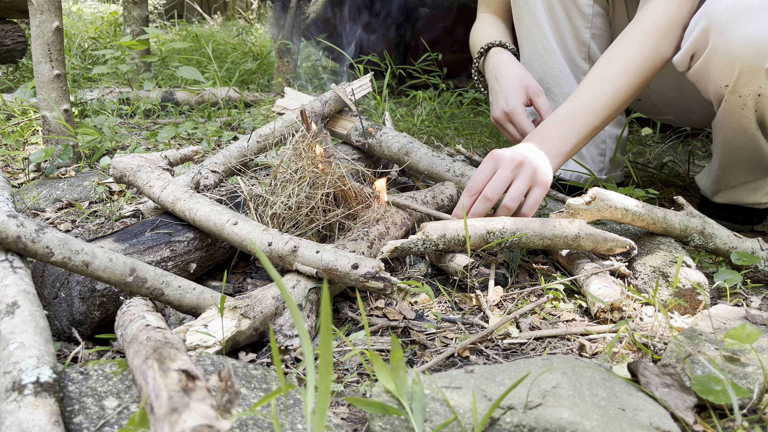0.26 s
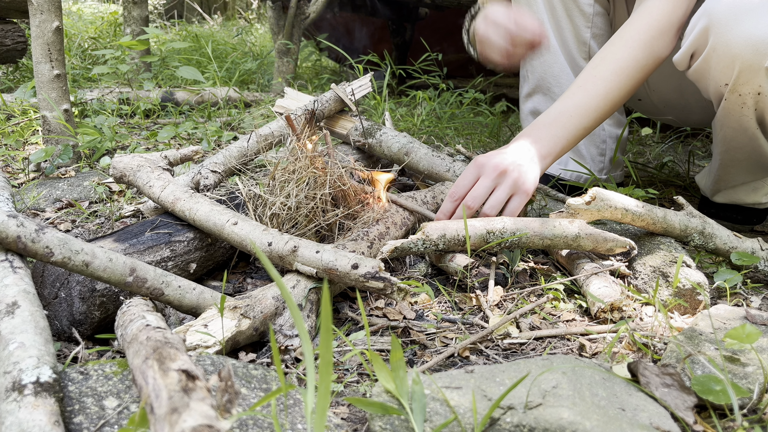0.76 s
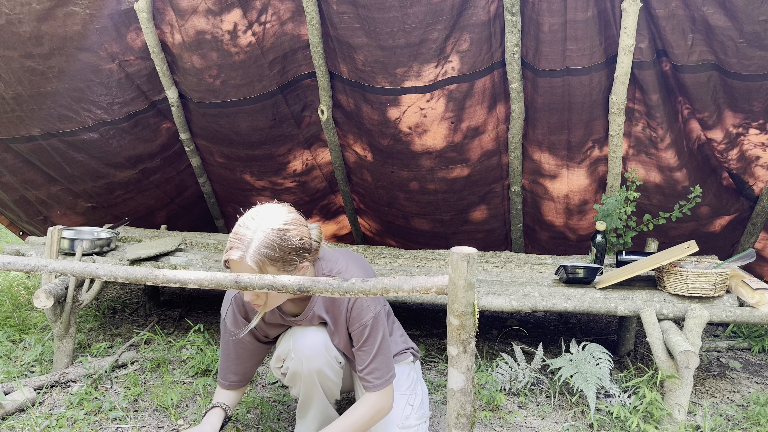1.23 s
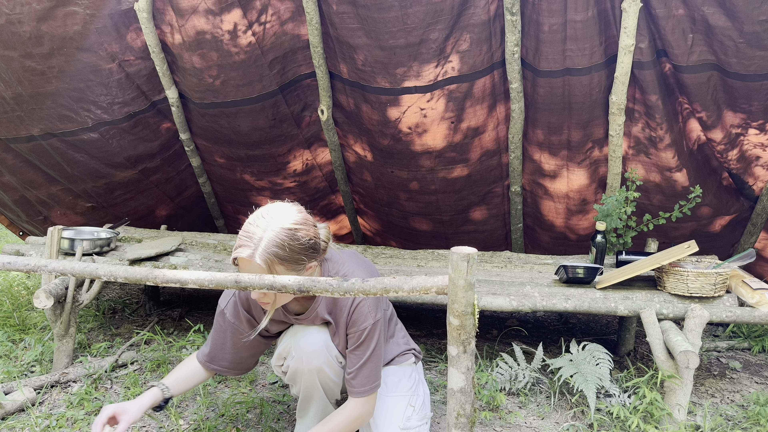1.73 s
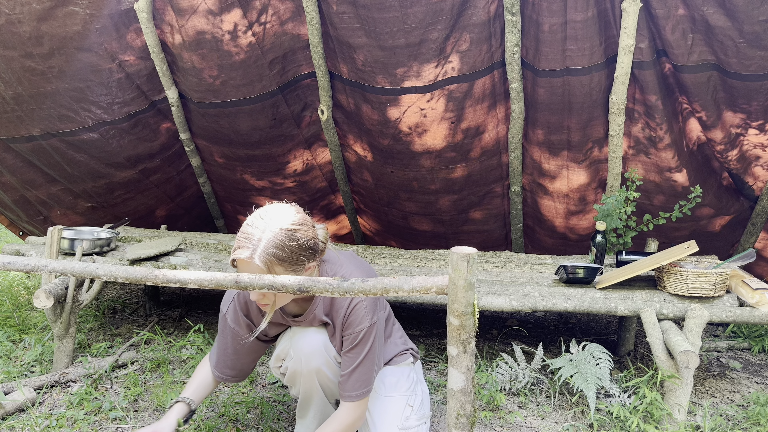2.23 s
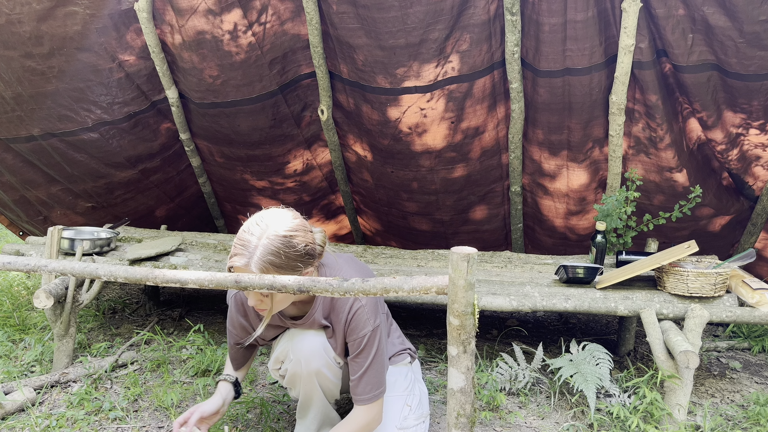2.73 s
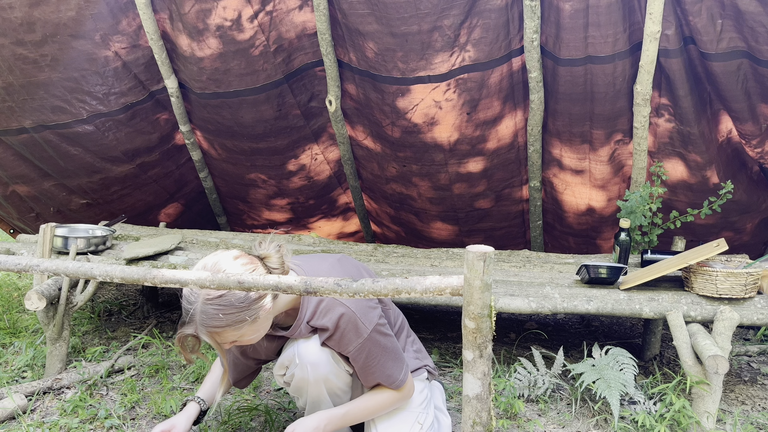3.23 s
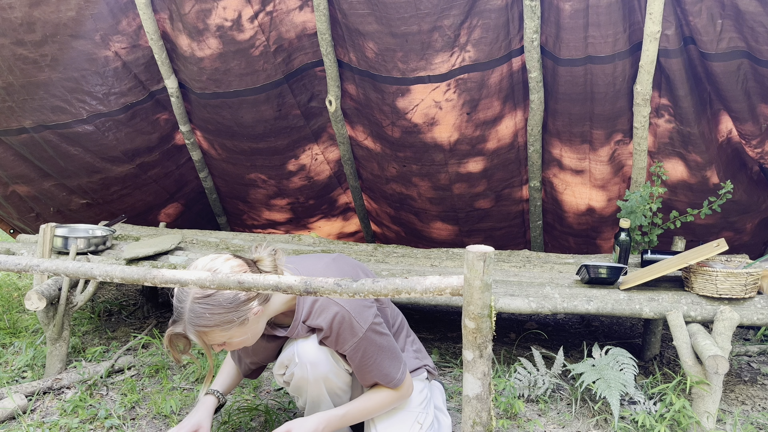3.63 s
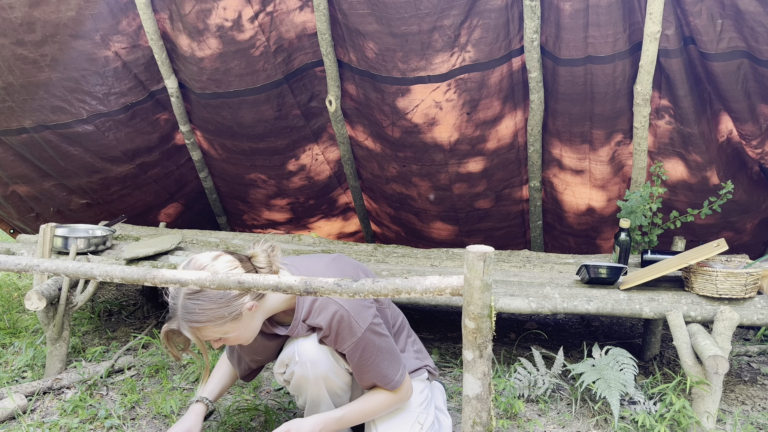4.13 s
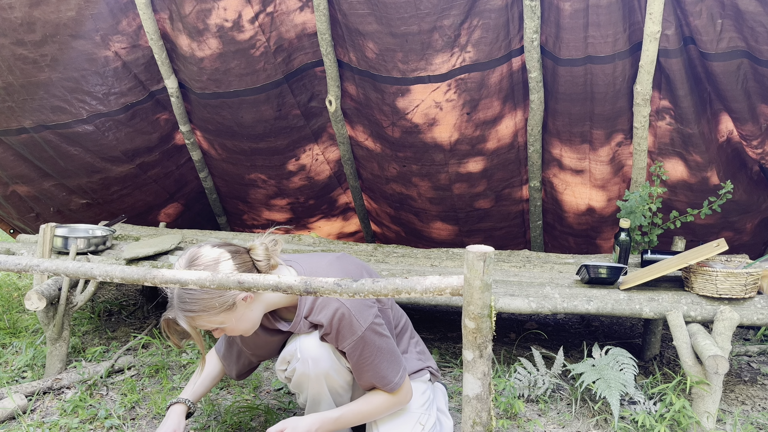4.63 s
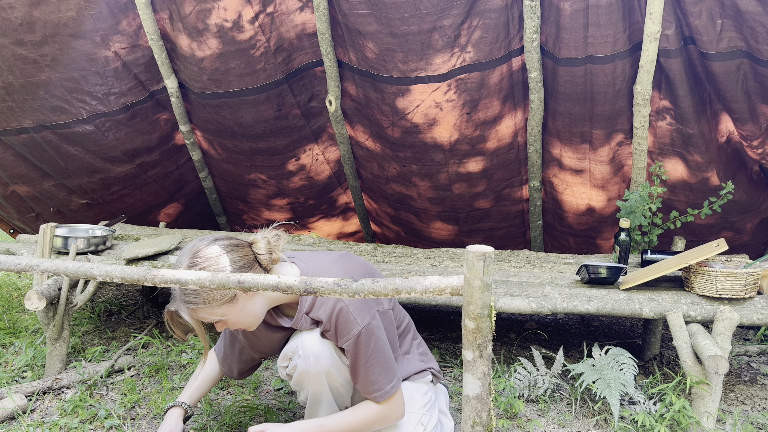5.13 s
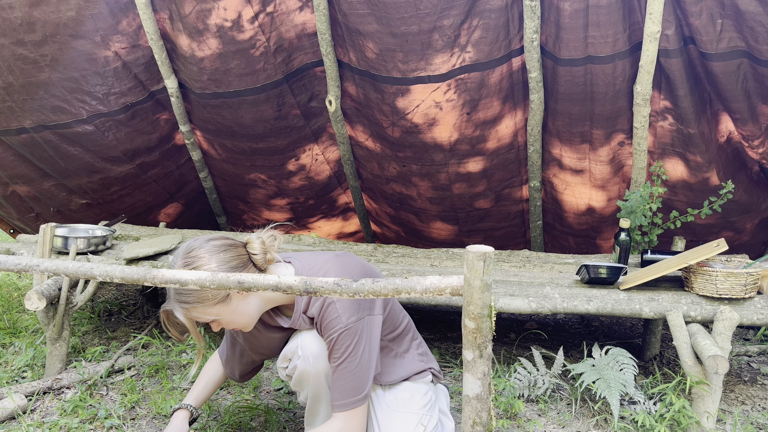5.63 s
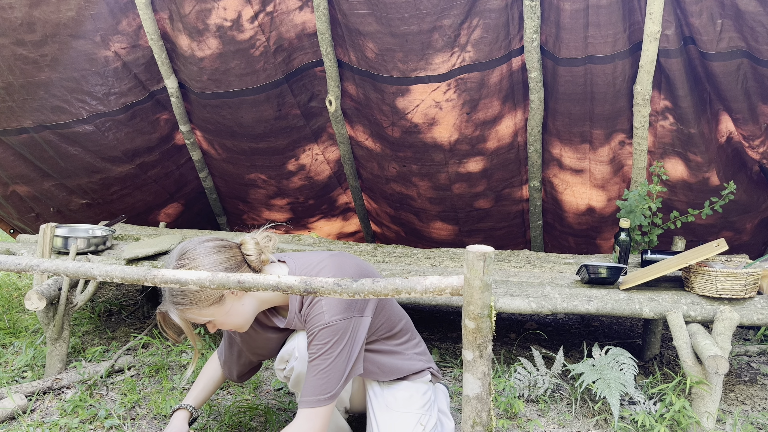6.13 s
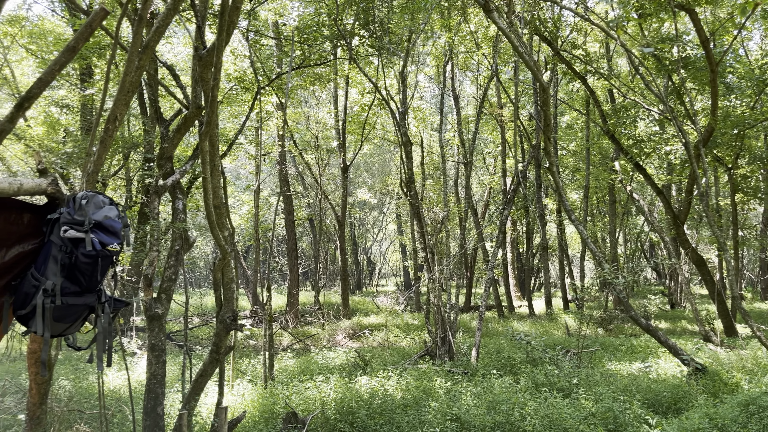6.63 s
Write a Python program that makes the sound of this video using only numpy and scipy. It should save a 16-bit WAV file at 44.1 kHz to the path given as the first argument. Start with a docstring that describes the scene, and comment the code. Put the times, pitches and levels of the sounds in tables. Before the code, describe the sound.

Woodland camp in four cut-together takes. Steady deep rumble dominates; crickets and leaves shimmer softly above. Tiny fire crackles open it, followed by twig rustles, a sharp crack and a woody knock around two seconds. Faint birds whistle and chip through tree echoes while a distant engine drones, rising in pitch midway. The last take is calmer, with one final snap and knock; open-air stereo pickup.

```python
"""A woodland camp in four scenes joined by quick fades. First a far road rumbles (shaped noise), leaves and grass
hiss, crickets sing (throbbing noise bands), a small fire snaps (short bursts), and the litter ticks.
In the second and third scenes an engine drones (two sines) and hands shift dry sticks (struck resonances);
three birds whistle (gliding sines), partly through echoes from the trunks (decaying noise).
The last scene brings a faint tone, with a last snap and knock near its start."""
import sys
import numpy as np
from scipy import signal
from scipy.fft import rfft, irfft, next_fast_len
from scipy.io import wavfile
from scipy.ndimage import uniform_filter1d, map_coordinates

SR = 44100
rng = np.random.default_rng(int(sys.argv[2]) if len(sys.argv) > 2 else 0)


def bounce(signal):
    """Save signal as a 16-bit WAV file at the path given by the first command-line argument."""
    frames = np.transpose(np.atleast_2d(signal))
    limited = np.clip(frames, -1, 1)
    pcm = np.round(limited * 32767).astype(np.int16)
    wavfile.write(sys.argv[1], SR, pcm)


def boost(x):
    """Linear amplitude factor 10**(x/20) for a level x in decibels (scalar or array-like)."""
    u = np.asarray(x, float) / 20
    return 10 ** u


N = 302967


def unit(x):
    """Normalisation by signal power: scales to rms 1."""
    return x / np.sqrt(np.mean(x ** 2) + 1e-20)


def along(points, hz):
    """Interpolation on a logarithmic frequency axis."""
    f, v = np.transpose(points)
    return np.interp(np.log(hz + 1), np.log(f + 1), v)


def curves(rows):
    """Piecewise-linear control curves: one value per sample for each column after the time."""
    s, *cols = np.transpose(rows)
    return [np.interp(np.arange(N) / SR, s, c) for c in cols]


def wobble(rate):
    """Low-frequency random modulation: a spline through normal knots, rate of them a second."""
    knots = rng.standard_normal(int(N * rate / SR) + 4)
    return map_coordinates(knots, [np.arange(N) * rate / SR])


def filtered(x, response):
    """Linear filtering: the spectrum times a complex response of frequency."""
    m = next_fast_len(N + 8192)
    return irfft(rfft(x, m) * response(np.fft.rfftfreq(m, 1 / SR)), m)[..., :N]


# The four scenes: (start time [s], road rumble [dB], tyre wash [dB],
# engine octave [dB re firing tone], steady twig rustle [dB]); levels are before random modulation
SCENES = [(0, -51.5, -72.5, -34, -98), (0.929, -50.5, -65.5, -13.5, -78.5), (3.2, -53, -64.5, -28.5, -89.5),
          (6.432, -54, -64.5, -30, -73.5)]


def by_scene(column):
    """Stepwise control: one column of the scene table, per sample."""
    table = np.array(SCENES)
    return table[np.searchsorted(table[1:, 0], np.arange(N) / SR), column]


# Left lead in the first three scenes: (frequency [Hz], phase [rad])
EARLY_LEAD = [(0, 0), (500, .1), (1200, -2.7), (1600, -2.9), (1900, .5), (4800, .8), (8000, -3),
              (9100, -3.3), (10900, -6.1), (12900, -6.4), (14600, -9.3), (15800, -9.5)]
# Left lead in the last scene: (frequency [Hz], phase [rad])
LAST_LEAD = [(0, 0), (400, -.2), (1000, -2.6), (6300, -3), (8100, -.1), (9600, .2), (11700, 3),
             (13100, 3.3), (15500, 6.2)]


def stereo(x):
    """Interchannel phase: half the left lead on each side, with another lead table in the last scene."""
    def spread(lead):
        half = lambda hz: .5j * np.interp(hz, *np.transpose(lead))
        return filtered(x, lambda hz: np.exp(half(hz) * [[1], [-1]]))
    return np.where(np.arange(N) / SR < SCENES[-1][0], spread(EARLY_LEAD), spread(LAST_LEAD))


# Left-right likeness of the noise: (frequency [Hz], shared share of power [0-1])
LIKENESS = [(100, 0.94), (300, 0.76), (600, 0.12), (1300, 0.29), (6500, 0.057), (7800, 0.93), (14000, 0.82),
            (15000, 0.97)]


def rush(spectrum, patchy_db):
    """Partial coherence: patchy stereo noise of rms 1, part shared by the channels and part each one's own."""
    z = signal.stft(rng.standard_normal((3, N)), nperseg=512)[2]
    field = uniform_filter1d(rng.standard_normal(z.shape[1:]), size=6, axis=0)
    field = uniform_filter1d(field, size=10, axis=1)
    noise = signal.istft(z * boost(patchy_db * unit(field)), nperseg=512)[1][:, :N]

    def response(hz):
        alike = np.clip(along(LIKENESS, hz), 0, 1)
        return boost(along(spectrum, hz)) * np.sqrt([alike, 1 - alike, 1 - alike])
    parts = filtered(noise, response)
    return unit(stereo(parts[0]) + parts[1:])


def add(track, s, sound):
    """Superposition: mixes a sound in at s seconds; the track starts one second early."""
    track[round((s + 1) * SR):][:len(sound)] += sound


# Echo among trunks: (frequency [Hz], 60 dB decay time [s])
TRUNK_DECAY = [(300, 0.25), (3000, 0.92), (7000, 0.66), (14000, 0.15)]


def echo(track, slice_s):
    """Diffuse reverberation: convolution with decaying noise, a new tail for each slice of time."""
    out, step = np.zeros((2, len(track) + 2 * SR)), round(slice_s * SR)
    for i in range(0, len(track), step):
        hz, t, z = signal.stft(rng.standard_normal((2, SR // 2)), SR, nperseg=256)
        decay = boost(-60 * t / along(TRUNK_DECAY, hz)[:, None])
        tail = signal.istft(z * decay, SR, nperseg=256)[1]
        part = signal.fftconvolve(track[None, i:i + step], tail / np.linalg.norm(tail[0]), axes=1)
        out[:, i:i + part.shape[1]] += part
    return out[:, SR:SR + N]  # drops the early second


# Relative spectrum of the far road: (frequency [Hz], level [dB])
ROAD_SPECTRUM = [(18, -30), (42, 10.5), (64, 12), (95, 11), (125, 3), (220, -5.5), (420, -37)]
# Relative spectrum of the tyre wash: (frequency [Hz], level [dB])
WASH_SPECTRUM = [(150, -15), (260, -3.5), (600, -4), (1000, -8), (1500, -16), (2200, -28.5), (3500, -52)]


def road():
    """Broadband noise shaping: rumble and tyre wash share one slow swell."""
    swell = wobble(3.294)
    rumble = boost(by_scene(column=1) + 0.68 * swell) * rush(ROAD_SPECTRUM, patchy_db=1.2)
    wash = boost(by_scene(column=2) + 0.73 * swell) * rush(WASH_SPECTRUM, patchy_db=1.25)
    return rumble + wash


# Engine drone: (time [s], firing frequency [Hz], level before modulation and channel gain [dB])
ENGINE_COURSE = [(.95, 54.5, -47.5), (1.54, 54.84, -44.5), (2.4, 54.53, -46.5), (2.55, 54.38, -52),
                 (3.18, 56.96, -55), (3.22, 71.46, -59.5), (3.62, 75.43, -60), (4.03, 76.85, -46.5),
                 (4.25, 80.66, -60.5), (4.61, 81.44, -49), (4.9, 74.5, -39), (5.14, 62.85, -43),
                 (5.4, 62.94, -38), (6.42, 63.54, -46)]


def engine():
    """Harmonic synthesis: firing tone and its octave, unsteady after the long path through the trees."""
    hz, db = curves(ENGINE_COURSE)
    phase = 2 * np.pi * np.cumsum(hz) / SR + 0.089 * wobble(6.6)
    t = np.arange(N) / SR
    heard = (t > SCENES[1][0]) & (t < SCENES[-1][0])
    firing = boost(1.15 * wobble(12)) * np.sin(phase)
    octave_db = by_scene(column=3) + 3.5 * wobble(8.7)
    octave = boost(octave_db) * np.sin(2 * phase + .9 * wobble(25))
    return boost(db) * heard * (firing + octave) * boost([[.4], [-.4]])


# Relative spectrum of the foliage: (frequency [Hz], level [dB])
LEAF_SPECTRUM = [(6300, -58), (7500, -22), (9500, 0), (13000, 2), (15800, 9)]
# Foliage hiss: (time [s], level before flutter [dB])
LEAF_LEVEL = [(0, -66), (.35, -83), (.55, -66.5), (.92, -75), (.95, -65), (1.5, -71), (1.75, -92),
              (2.35, -58), (2.9, -73.5), (3.18, -94), (3.22, -66), (3.9, -63.5), (4.3, -62), (4.9, -62),
              (5.2, -68), (6.44, -61), (6.62, -77)]


def foliage():
    """Amplitude-modulated noise: the leaf hiss rises, falls and flutters."""
    hiss_db, = curves(LEAF_LEVEL)
    flutter_db = 1.3 * wobble(14)
    return boost(hiss_db + flutter_db) * rush(LEAF_SPECTRUM, patchy_db=3.0)


# Crickets: (start [s], end [s], centre [Hz], half-width at 1/e [Hz], pulse rate [1/s],
# level before the slow swell [dB])
CRICKET_BANDS = [(0, .93, 7840, 345, 80, -74), (0.928, 3.2, 7500, 314, 55, -81),
                 (3.2, 6.43, 7740, 307, 74, -79), (.93, 5.9, 9900, 304, 50, -88),
                 (6.43, 4.9, 7760, 250, 37, -79.5), (6.43, 7, 10350, 398, 80, -83.5)]


def crickets():
    """Narrow-band modulation: bands of wing scrape throb at the pulse rate and swell slowly."""
    t, out = np.arange(N) / SR, np.zeros(N)
    for start, end, hz, width_hz, rate, db in CRICKET_BANDS:
        band = filtered(rng.standard_normal(N), lambda f: np.exp(-((f - hz) / width_hz) ** 2))
        throb = 1 + 0.5 * np.sin(2 * np.pi * rate * t + 1.3 * wobble(4.7))
        heard = (t > start) & (t < end)
        out += boost(db + 0.41 * wobble(0.88)) * unit(band * throb) * heard
    return stereo(out)


def tone():
    """Phase modulation: a thin, slightly wavering sine in the last scene."""
    tone_hz, rms_db = 1450, -83
    t = np.arange(N) / SR
    wave = np.sin(2 * np.pi * tone_hz * t + 0.67 * wobble(12))
    return boost(rms_db) * np.sqrt(2) * wave * (t > SCENES[-1][0])


def whistle(length_s, start_hz, end_hz, db, burr=0, bend=1):
    """Frequency modulation: a soft-ended sine; burr shakes its pitch, bend under 1 hurries the slur."""
    u = np.linspace(0, 1, round(length_s * SR))
    shake = 1 + burr * unit(uniform_filter1d(rng.standard_normal(len(u)), size=150))
    hz = (start_hz + (end_hz - start_hz) * u ** bend) * shake
    return boost(db) * np.sin(np.pi * u) ** 0.82 * np.sin(2 * np.pi * np.cumsum(hz) / SR)


def falling_series(far, near):
    """Pitch glides in series: slurred notes slow, sink, and swell to a loudest moment before fading."""
    first_s, gap_s, gap_grows_s = 1.181, .1489, 0.00084  # the gap grows once a note
    first_hz, sink_hz_per_s = 3070, 134
    loudest_s, loudest_db, swell_db_per_s2 = 2.27, -60, 4
    for k in range(16):
        s = first_s + gap_s * k + gap_grows_s * k * (k - 1) / 2
        hz = first_hz - sink_hz_per_s * (s - first_s)
        db = loudest_db - swell_db_per_s2 * (s - loudest_s) ** 2
        slur = whistle(0.0214, 1.1 * hz, .87 * hz, db)
        add(far, s - .004, slur)
        add(near, s - .004, boost(-22.5) * slur)
        # a higher, nearly level note before each slur, ever weaker beside it
        lead_note = whistle(0.056, 1.21 * hz, 1.16 * hz, db - 11 - .5 * k, burr=0.0283)
        add(far, s - 0.061, lead_note)


# Notes of a phrase: (time after its start [s], length [s], start pitch [Hz], end pitch [Hz],
# level re phrase [dB])
PHRASE_NOTES = [(0, 0.1, 3560, 3400, 0.5), (0.042, .06, 3450, 2880, -2), (0.063, .06, 4700, 3750, -3),
                (0.081, 0.15, 3410, 3330, -3.5), (0.106, 0.076, 4260, 3700, -4.5),
                (0.154, .09, 5140, 4440, -9.5)]
# Phrase starts: (time [s], level before path gains [dB])
PHRASE_STARTS = [(-.15, -76), (2.772, -68), (4.708, -68), (5.864, -67.5)]
# Nearly level whistles: (time [s], length [s], pitch [Hz], level before path gains [dB])
PIP_NOTES = [(1.04, 0.067, 3170, -76), (2.311, 0.063, 1906, -67.5)]
# Rising chips: (time [s], peak level before path gains [dB], direct sound re that level [dB])
CHIP_NOTES = [(1.396, -64.5, -3), (1.778, -68, -6), (2.53, -67, -21), (3.32, -63, -42), (4.227, -65, -13),
              (5.164, -63, -16), (5.336, -61, 10)]


def birds():
    """Direct and reverberant sound: two far singers on the left, mostly echo, and a nearer bird giving chips."""
    far, near, chips = np.zeros((3, N + 2 * SR))
    falling_series(far, near)
    for s, db in PHRASE_STARTS:
        for after, length_s, start_hz, end_hz, level in PHRASE_NOTES:
            burr = 0.0031 + .16 * after
            note = whistle(length_s, start_hz, end_hz, db + level, burr=burr, bend=0.79)
            add(far, s + after, note)
            add(near, s + after, boost(-13) * note)
    for s, length_s, hz, db in PIP_NOTES:
        pip = whistle(length_s, hz, 1.02 * hz, db, burr=0.032)
        add(near, s, pip)
        add(far, s, .5 * pip)
    for s, db, over_db in CHIP_NOTES:
        chip = whistle(0.0102, 5170, 7910, db, bend=0.53)
        add(near, s - .003, boost(over_db) * chip)
        add(chips, s, chip)
    left = boost([[2.2], [-2.2]])
    direct = left * stereo(boost(-8) * far[SR:SR + N]) + stereo(near[SR:SR + N])
    return direct + left * echo(boost(-0.5) * far + boost(3.0) * chips, 0.055)


# The clearest ticks: (time [s], impulse level before the band filter and its gain [dB])
CLEAR_TICKS = [(4.606, -44), (4.852, -41.5), (5.0, -49), (5.532, -49)]


def ticks():
    """Filtered impulses: sparse bright ticks of random time and size in the litter, and a few set ones."""
    count, level_db, spread_db, centre_hz = 83, -68, 6, 10500
    train, draw = np.zeros(N), rng.random((count, 2))
    train[(draw[:, 0] * N).astype(int)] = boost(level_db - spread_db * np.log(draw[:, 1] + .02))
    for s, db in CLEAR_TICKS:
        train[round(s * SR)] = boost(db)
    bright = filtered(train, lambda hz: np.exp(-(np.log((hz + 1) / centre_hz) / 0.15) ** 2))
    return stereo(bright * SR / centre_hz)


# A hand drags twigs: (time [s], time until the fall [s], level before unevenness [dB])
DRAGS = [(0.953, 0.071, -70.5), (1.354, 0.43, -69), (1.922, 0.24, -70), (2.798, 0.1, -68),
         (4.084, 0.025, -70), (4.214, 0.19, -68), (4.553, 0.085, -68)]


def drag_level():
    """Power addition of envelopes: a steady rustle, and drags that rise, hold and die away."""
    attack_s, fall_db_per_s = .015, 80
    t = np.arange(N) / SR
    power = boost(by_scene(column=4)) ** 2
    for s, hold_s, db in DRAGS:
        fall_db = fall_db_per_s * np.maximum(t - s - hold_s, 0)
        power += (boost(db - fall_db) * np.clip((t - s) / attack_s, 0, 1)) ** 2
    return np.sqrt(power)


# Relative spectrum of the dragged twigs: (frequency [Hz], level [dB])
TWIG_SPECTRUM = [(900, -30), (1800, -3.5), (4200, -6), (6000, -9.5), (8000, -9), (16000, -7)]


def twigs():
    """Friction noise: the rustle comes in fast uneven scrapes."""
    uneven_db = 1.8 * wobble(14) + 1.2 * wobble(90)
    return drag_level() * boost(uneven_db) * rush(TWIG_SPECTRUM, patchy_db=1.2)


# Snaps of fire and twigs: (time [s], peak level before path gains [dB], centre frequency [Hz])
SNAP_BURSTS = [(0.147, -60, 10100), (0.347, -48.5, 11200), (0.665, -49.5, 11710), (0.692, -51.5, 13550),
               (.742, -53.5, 5300), (0.85, -64, 3500), (1.573, -45.5, 9800), (1.589, -39.5, 11100),
               (2.024, -56, 4220), (2.094, -46, 4170), (2.1, -42, 9000), (2.690, -56, 2580),
               (2.838, -46, 2700), (2.848, -55, 2600), (6.75, -42, 3072)]


def snaps(track, t, f):
    """Impulsive noise: short bursts round a centre frequency, each with a weak longer tail."""
    for s, db, hz in SNAP_BURSTS:
        colour = .65 / (1 + (f / (1.6 * hz)) ** 4) + np.exp(-(np.log(f / hz) / .35) ** 2)
        noise = rfft(rng.standard_normal(len(t)))
        burst = unit(irfft(noise * colour * (f > 1200), len(t)))
        burst = burst * (boost(-60 * t / 0.009) + boost(-15 - 60 * t / 0.13))
        add(track, s, boost(db) * burst / np.abs(burst).max())


# Sticks set down: (time [s], rms level before path gains [dB], dullness [dB per octave])
STICK_KNOCKS = [(0.962, -62.5, 12), (2.092, -52, 0), (2.689, -74.5, -6), (2.838, -71, -8.5),
                (6.7482, -63, -6)]
# Resonances of a stick: (frequency [Hz], bandwidth [Hz], level before dulling [dB])
STICK_MODES = [(228, 197, -1), (686, 380, -1.5), (1146, 133, 5), (1666, 124, 2), (2116, 265, -8.5)]


def knocks(wood, t, f):
    """Modal resonance and dispersion: rough blows pass through broad modes, the lows lagging."""
    bend_s = 0.0048  # bending waves: lag of 1 kHz behind the limit of very high frequency
    bend = np.exp(-4j * np.pi * bend_s * (np.sqrt(1000 * f) - f / 4))
    for s, db, dull_db in STICK_KNOCKS:
        body = 0
        for k, (hz, width_hz, level) in enumerate(STICK_MODES):
            damping = 1j * f * width_hz
            gain = (-1) ** k * boost(level - dull_db * np.log2(hz / 700))
            body = body + gain * damping / (hz * hz - f * f + damping)
        blow = rng.standard_normal(len(t)) * boost(-11.0 - 60 * t / 0.067) * (1 - np.exp(-t / 0.0016))
        blow[0] = 3.3  # first contact
        soft = boost(-max(dull_db, 0) * np.log2(1 + f / 700))  # a soft contact also loses its treble
        add(wood, s, boost(db) * unit(irfft(rfft(blow) * body * soft * bend, len(t))))


def sticks():
    """Direct and reverberant sound: snaps and knocks a little louder on the left, with the trunks' echo."""
    track, wood = np.zeros((2, N + 2 * SR))
    t = np.arange(SR // 8) / SR
    f = np.fft.rfftfreq(len(t), 1 / SR) + 1
    snaps(track, t, f)
    knocks(wood, t, f)
    centred = 0.32 * wood + 0.07 * track  # in phase in both channels
    direct = stereo((track + wood)[SR:SR + N]) + centred[SR:SR + N]
    return boost([[1.5], [-1.5]]) * direct + boost(-11.5) * echo(track + boost(-7) * wood, 0.15)


def scene():
    """Superposition of all sources, faded out and in where two scenes meet."""
    t, fade_s = np.arange(N) / SR, 0.036
    fade = np.prod([np.clip(np.abs(t - s) / fade_s, .04, 1) for s, *_ in SCENES[1:]], axis=0)
    background = road() + engine() + foliage() + crickets() + tone()
    return fade * (background + birds() + ticks() + twigs() + sticks())


def top_cut(x):
    """Nothing passes above the cut-off."""
    return signal.sosfilt(signal.butter(12, 15810, fs=SR, output="sos"), x)


def record(dry):
    """Band limitation: a sharp low-pass ends the treble."""
    top_hz = 15810
    mix = filtered(dry, lambda hz: hz < top_hz)
    return top_cut(mix)


dry = scene()
out = record(dry)
bounce(out)
```